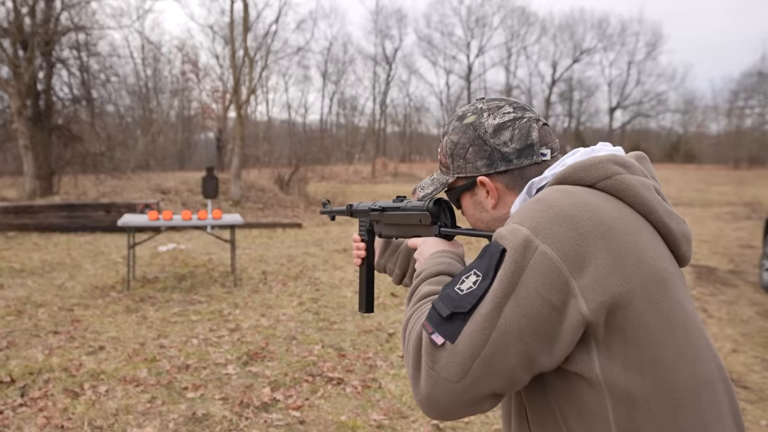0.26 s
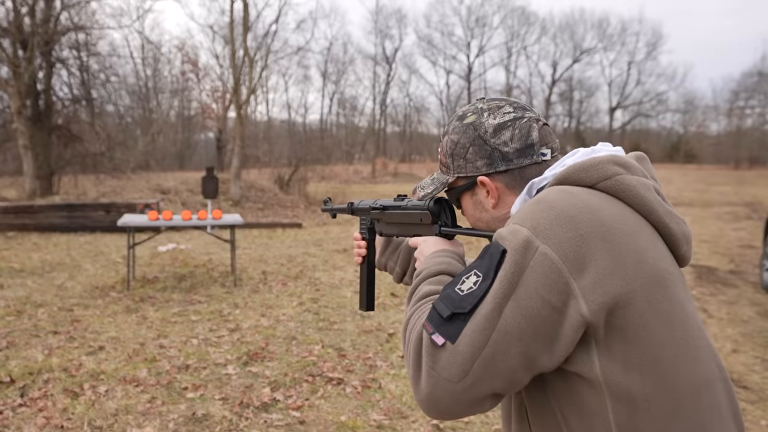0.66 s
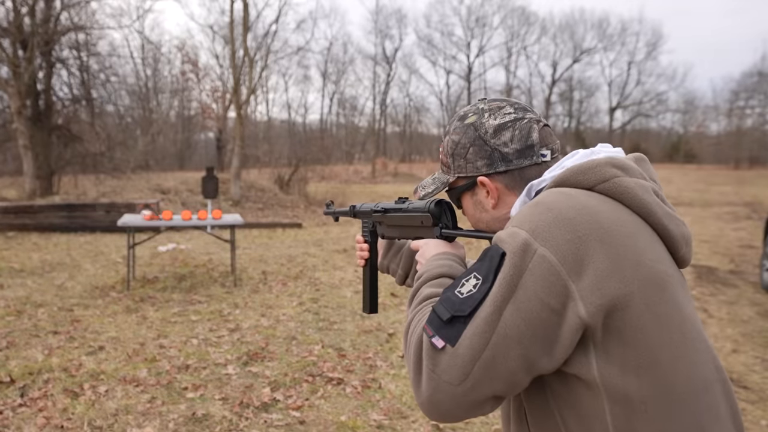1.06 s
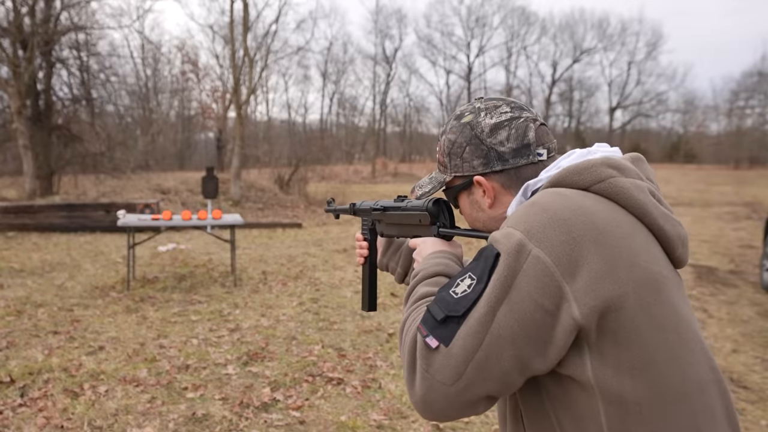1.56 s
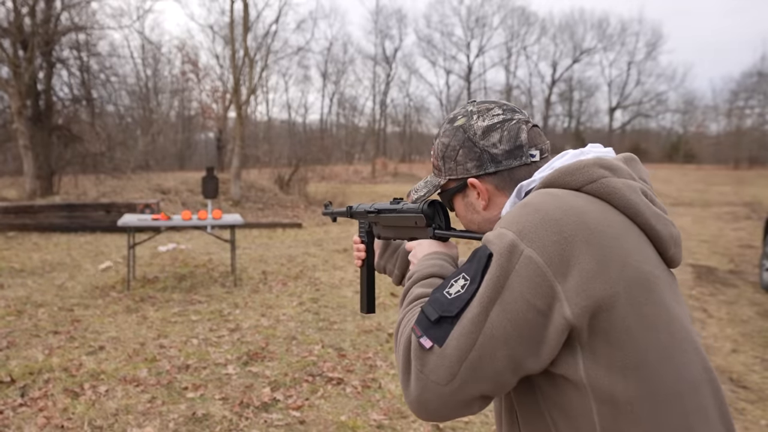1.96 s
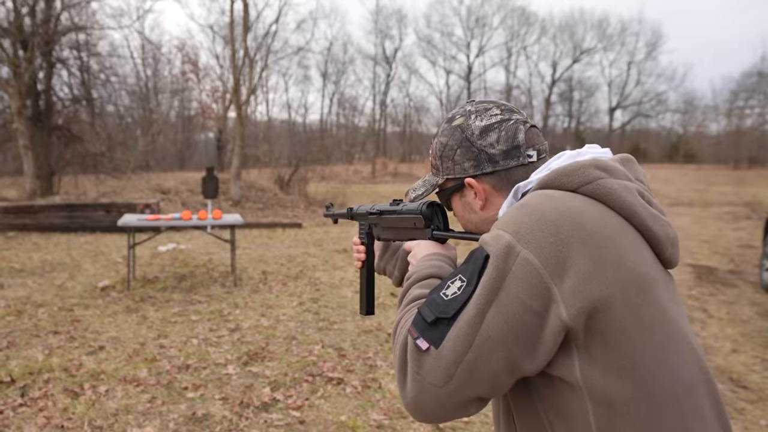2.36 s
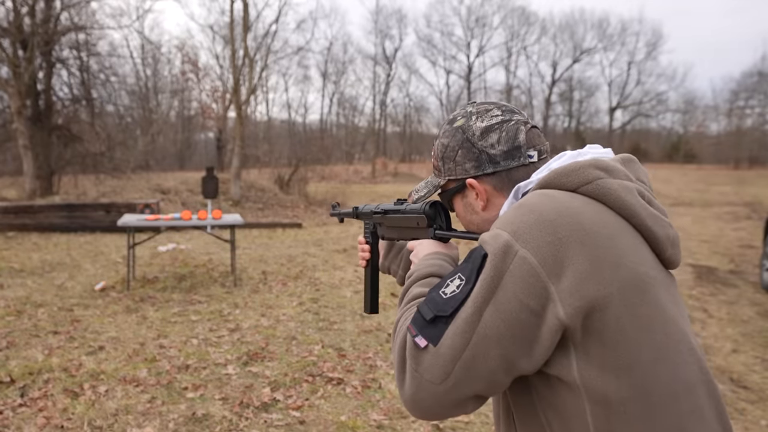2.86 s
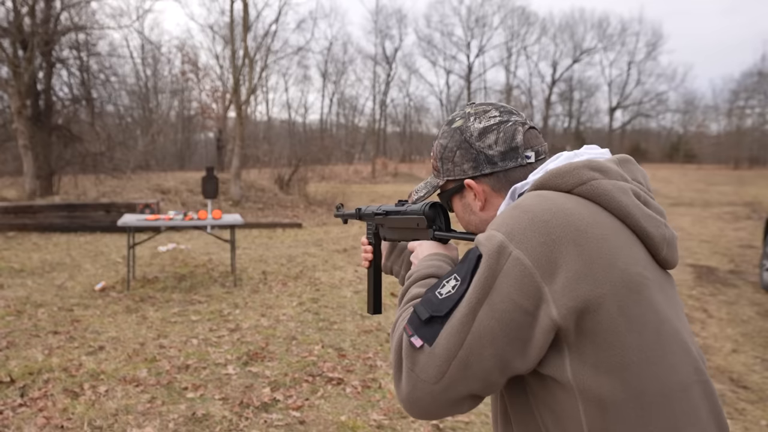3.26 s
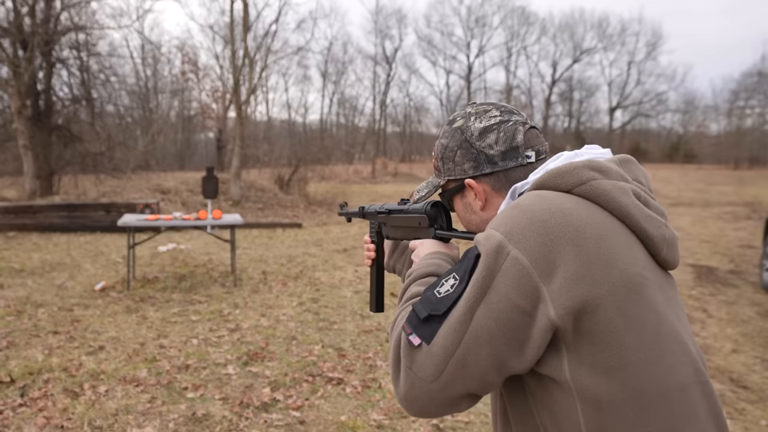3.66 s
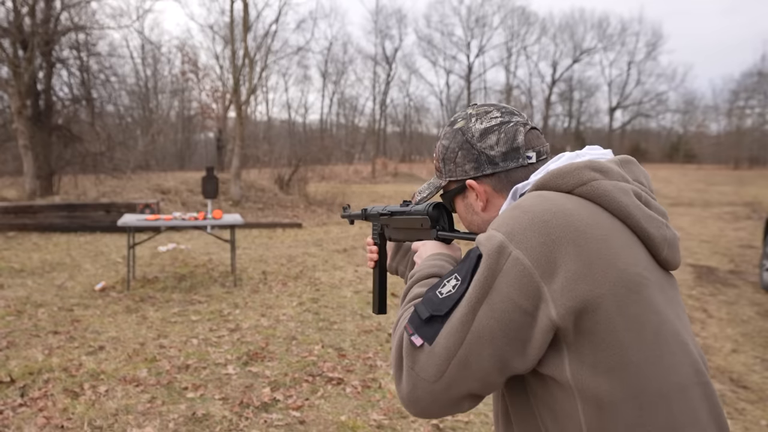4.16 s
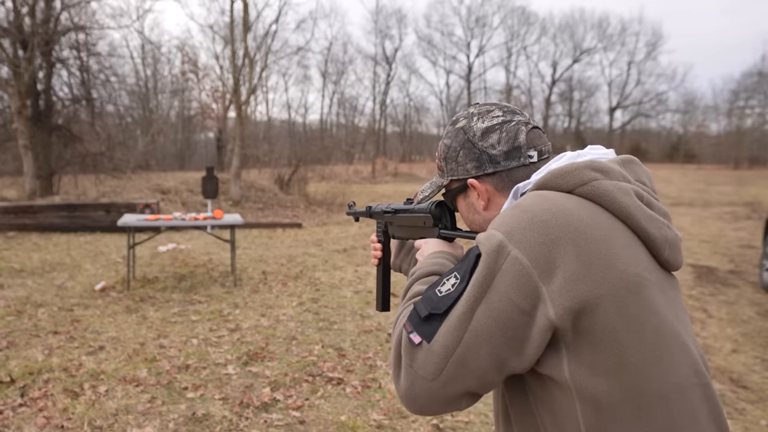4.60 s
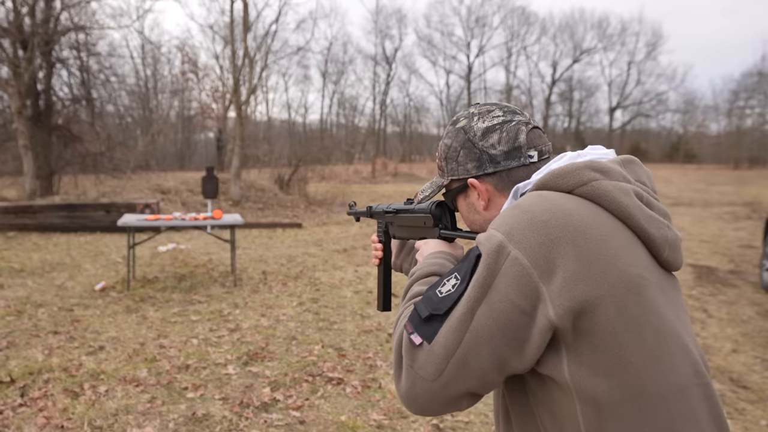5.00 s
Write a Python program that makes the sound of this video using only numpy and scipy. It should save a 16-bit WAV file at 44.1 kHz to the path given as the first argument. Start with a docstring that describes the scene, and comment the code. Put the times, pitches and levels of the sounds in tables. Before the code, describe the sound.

Close outdoor pickup, a step from the gun. Soft wind gusts and a very faint distant road drone come first, with a tiny tick. Then five rapid two- or three-shot bursts snap out, with hissing gas, a low thump and clattering steel. Between them, hollow table knocks, small ticks and leaf patter mix with lumpy woody echoes; after the third burst a small metal ping sounds.

```python
"""A light wind rumbles and gusts over a faint road drone and open-country hush; now and then a bit ticks down.
Then a gas-powered automatic BB gun fires five short bursts in a field, a step from the microphone.
In each, the trigger and bolt clack, gas thumps from the muzzle, and the bolt slams, rebounds and rattles.
Knocks of targets, table and woody returns follow, crumbs patter and the trees echo; once a metal target rings.
Blows are short noise bursts, ringing is fading sine waves, and wind and echo are shaped noise."""
import sys
import numpy as np
from scipy import signal
from scipy.fft import rfft, irfft
from scipy.io import wavfile
from scipy.ndimage import uniform_filter1d, map_coordinates

SR = 44100
rng = np.random.default_rng(int(sys.argv[2]) if len(sys.argv) > 2 else 0)


def store_wav(level_fs):
    """Save 16-bit WAV to argv[1]."""
    pcm = np.round(np.clip(np.atleast_2d(level_fs), -1, 1) * 32767)
    wavfile.write(sys.argv[1], SR, pcm.T.astype(np.int16))


N = 230988
TIME = np.arange(N) / SR

# Levels in dB are relative: most layers get a further gain when they are mixed.
# Gun shots, one list for each burst: start_s, level_db
SHOTS_BY_BURST = [
    [(.8740, -2), (.9329, .5), (.9950, 1.5)],
    [(1.9979, -1.5), (2.0548, 0)],
    [(3.0851, -1.5), (3.1409, 2.5)],
    [(4.038, -1.5), (4.0953, 1)],
    [(4.9886, -1.5), (5.0456, -1), (5.1090, -1)],
]
# How each burst starts and ends: trigger_lead_s (before the sear), trigger_db, slam_s, slam_db,
# rebound_s, rebound_db, settling_rattle_db, settling_decay_s
BURST_ENDS = [(.008, -34, 1.0458, -8.5, 1.0718, -12, -24, .016),
              (0.0044, -37, 2.1028, -7, 2.115, -15.5, -37, .018),
              (.016, -32.5, 3.1865, -5, 3.2022, -8.5, -22, 0.053),
              (.0135, -29, 4.1378, -7, 4.159, -9.5, -20.5, .027),
              (0.006, -29, 5.1526, -7, 5.1702, -12, -24.5, 0.026)]
# Stray knocks of the gun's loose parts: start_s, level_db, decay_ms, receiver_knock_db (added to level_db)
LOOSE_PARTS = [(.9905, -8.5, 1.8, 0.5), (1.0157, -17.5, 4.8, -25), (1.058, -21, 6, -4),
               (1.0665, -17.5, 4.4, 6), (1.087, -17.5, 7.3, -14), (2.983, -34, 1.4, -38),
               (2.9928, -31.5, 4.1, -18), (3.2085, -18.5, 11, -6.5), (4.205, -21.5, 4.1, -6),
               (5.0878, -8, 2.4, -6.5), (5.194, -23, 2.5, 2)]
# Tones of the gun's steel: pitch_hz, level_db, t60_s (time to fade by 60 dB)
STEEL_TONES = [(872, -12, 0.15), (1179, -15, 0.24), (1368, -4.5, 0.13), (1530, -3.5, 0.026),
               (1662, 0, 0.077), (1817, -7, 0.022), (2260, 2, 0.036), (2780, -5, .04), (3190, 1.5, 0.028),
               (3380, -6.5, 0.027), (3530, -1.5, 0.1), (3870, -10, .03), (4240, -18, .03),
               (4780, -16.5, 0.13), (6100, -10, 0.033), (8050, -6, .04)]
# Knocks after the shots: targets and table struck, and some woody returns of the shots from the trees:
# start_s, level_db, decay_ms, hollow_knock_db (added to level_db)
LATER_KNOCKS = [(1.186, -30.5, 3.7, 9), (1.201, -25.5, 11, 1), (1.239, -22.5, 4.9, -1),
                (1.327, -36, 8.3, 6), (1.390, -35.5, 15.5, 4.5), (1.441, -38, 26, -8), (2.270, -34, 12, -1),
                (2.372, -32.5, 6.2, -1.5), (3.311, -19.5, 2.6, -5), (3.351, -26.5, 2.4, 1.5),
                (3.387, -21.5, 3.4, -10), (3.421, -32.5, 20, 6.5), (3.452, -33.5, 15, 6.5),
                (3.4862, -12.5, 2.8, -6.5), (3.4945, -26.5, 30.3, -3.5), (3.688, -33, 3.5, -26),
                (4.296, -22.5, 3.2, -2), (4.3655, -24.5, 16, -19), (4.421, -25, 10, 2.5),
                (4.482, -49, 6.3, 14)]
# Bits and spent BBs landing: start_s, level_db, decay_ms, dull_part_db (added to level_db)
LANDINGS = [(.735, -61, 2.5, 9.5), (1.634, -37, 2.1, -8.5), (1.758, -52.5, 3.3, 10.5), (1.777, -59, 4.4, 8),
            (1.8245, -48.5, 4.6, 9), (2.139, -19, 1.1, -6), (2.471, -28.5, 1.4, -24),
            (2.672, -40.5, 2, -18), (2.728, -44.5, 1.9, -19), (2.736, -38, 2, -8.5), (2.763, -37.5, 2, 3.5),
            (3.799, -52, 2, 5), (3.842, -28, 1.3, -24), (3.927, -49.5, 2.8, -18), (4.596, -41.5, 2.2, -3),
            (4.82, -58.5, 4, 6.5), (4.8915, -38, 1.2, -19)]
# Tones of the table and hollow targets: pitch_hz, level_db, t60_s
TABLE_TONES = [(255, -14, 0.094), (313, -15.5, 0.087), (515.5, -1.5, 0.054), (598, -0.5, 0.039),
               (706, -4.5, 0.046), (831, 0, 0.051), (980, -2, 0.035), (1090, -5, 0.022), (1270, -11, 0.017),
               (1620, -3.5, 0.039), (2300, -18, 0.02)]
# Tones of one metal target: pitch_hz, level_db, t60_s
TARGET_TONES = [(2270, -9, .07), (3042, -9, 0.091), (6235, 1.5, 0.034), (6200, -12, 0.14),
                (6170, -1, 0.034), (7950, -19, .06)]
# Stands of trees that return a dull, woody clump: delay_s, level_db, spread_s
TREE_STANDS = [(.1, -12, .012), (0.164, -4.5, .012), (.392, -7.5, 0.014)]
# Gusts on the microphone: peak_s, level_db, half_length_s
WIND_GUSTS = [(0.136, -34, .045), (.57, -30.5, 0.032), (.66, -31, 0.038), (1.875, -32, 0.056)]
# Faint drone of a far road, a path through points: time_s, pitch_hz, level_db
ROAD_DRONE = [(0, 468.6, -63.5), (.5, 455, -74), (3.95, 400, -71.5), (4.6, 409.6, -62), (5.24, 417, -68)]

# Colours of sound, all with the columns: pitch_hz, level_db (per Hz)
# pressure thump of the muzzle gas
BLAST_COLOUR = [(40, -21.5), (80, -8), (150, -3), (270, -4.5), (340, -0.5), (430, -6.5), (560, -8),
                (720, -15), (1000, -21.5), (2000, -36), (8000, -54.5)]
# hiss of the muzzle gas
GAS_COLOUR = [(150, -27), (500, 5.5), (800, -3), (1400, 1.5), (2100, -4), (3300, 0.5), (4500, -7),
              (7500, -7), (10000, -8.5), (15000, -11.5)]
# sharp clack of the gun's moving parts
CLACK_COLOUR = [(100, -19), (650, -35), (1000, -19.5), (1500, -4), (2050, -7), (3000, -2.5), (3650, 2.5),
                (4400, -12), (5600, -12), (7500, -10), (10000, -15.5), (15000, -14.5)]
# heavier knock of the receiver
KNOCK_COLOUR = [(80, -24), (350, -18.5), (550, -2), (750, -1.5), (1000, -2.5), (1380, 3), (1900, -10.5),
                (3000, -22), (8000, -42)]
# sharp part of the later knocks, and the dull part of landing bits
STRIKE_COLOUR = [(150, -40), (700, -16), (1500, -2), (2200, -5), (3300, 4), (4500, -9.5), (7000, -11.5),
                 (10000, -14.5), (15000, -24)]
# hollow part of the later knocks
HOLLOW_COLOUR = [(100, -12), (250, 1.5), (380, -6), (550, 1), (820, -4), (1100, -6), (1600, -6),
                 (3000, -8.5), (8000, -51.5)]
# bright tick of landing bits
TICK_COLOUR = [(300, -25), (2000, -6), (4000, -2.5), (6000, -2), (9500, -0.5), (12000, -9.5), (15000, -5.5)]
# echo of the tree line
WOODS_COLOUR = [(60, -9.5), (150, -2), (260, 1), (370, -4), (550, 1), (850, -1), (1100, -4), (1550, -3.5),
                (2200, -5.5), (3300, -2), (4500, -8.5), (7500, -15.5), (15000, -28)]
# wind on the microphone
RUMBLE_COLOUR = [(15, -5.5), (35, 5.5), (60, -2), (100, -7), (150, -13.5), (250, -41), (600, -78),
                 (3000, -100)]
# hush of open country
AIR_COLOUR = [(100, 5.5), (200, -1), (300, -1.5), (480, -8), (700, -7.5), (1000, -13), (1500, -19),
              (2300, -27), (3400, -22), (4500, -31.5), (8000, -35), (15000, -34)]

# The blows of every burst: decay_ms, receiver_knock_db (added to the blow's level)
TRIGGER, SEAR, BUFFER, SLAM, REBOUND = (6.9, -12.5), (3.9, -24), (3, -19.5), (1.94, -6), (2.76, -1.2)
SEAR_LEAD_S, SEAR_DB = .0271, -15.5  # the sear lets the bolt go this long before the first shot
# the bolt reaches its rear buffer this long after a shot; the first shot throws it less hard
RECOIL_S, BUFFER_DB, FIRST_RECOIL_DB = .0275, -18.5, -11
SLIDE_DB, SLIDE_BUILD_DB_PER_S = -37, 27  # bolt and spring rattle more as the burst goes on
STROKE_DB, STROKE_RISE_S, STROKE_FALL_S = -29, 0.0093, .012  # the bolt scrapes hardest around each shot
SETTLE_KNOCK_DB = -7  # weight of the receiver's knock in the settling rattle
PING_S, PING_DB = 3.4945, -17.5
# the field's echo builds up, then dies away over a faint late tail
ECHO_BUILD_S, ECHO_T60_S, LATE_DB, LATE_T60_S = 0.047, 1.12, -32.5, 3.8
STAND_DULL_HZ = 1100
# the breeze slowly eases and wavers
WIND_DB, WIND_EASE_DB_PER_S, WIND_WAVER_DB, WIND_WAVER_S = -37.5, -1.5, 2, 0.055
TOP_HZ = 16000  # the recorder cuts the sound above this


def muzzle():
    """Gas leaves the barrel as a low thump with a spitting hiss and a sharp crack; nearby surfaces return the crack."""
    out = undb(8) * colour(reports(), BLAST_COLOUR)
    t = TIME[:SR // 20]
    for s, db in shots():
        vary = 1 + 0.041 * rng.standard_normal(2)
        # the valve leaks a moment before it opens fully
        leak = np.exp((t - .003) / 0.0011)
        emptying = np.exp((.003 - t) / 0.0026)
        flow = np.minimum(leak, emptying)
        hiss = colour(grainy(4, .0002, size=len(t)) * flow, GAS_COLOUR)
        add(out, s - .0025, undb(db - 13) * hiss)
        crack = undb(-7) * swing(3300 * vary[0], 0.0012, .0018)
        crack += undb(-10.0) * swing(7500 * vary[0], 0.00034, .0018)
        slaps = undb(-6) * swing(2900 * vary[1], .0004, .0046)
        slaps += undb(-13) * swing(2900, .0003, .01)
        add(out, s, undb(db) * (crack + slaps))
    return out


def reports():
    """The sharp pressure spike that each shot sends downrange."""
    out = np.zeros(N)
    for s, db in shots():
        add(out, s, undb([db]))
    return out


def shots():
    """Every shot of every burst: start_s, level_db."""
    return [shot for burst in SHOTS_BY_BURST for shot in burst]


def swing(hz, decay_s, delay_s):
    """One damped pressure swing that starts after a delay."""
    t = np.maximum(TIME[:SR // 20] - delay_s, 0)
    return np.sin(2 * np.pi * hz * t) * np.exp(-t / decay_s)


def action():
    """The bolt's blows and its sliding rattle excite the receiver, whose steel rings on."""
    sharp, heavy = contacts(blows(), rise_ms=.3, low_stretch=1.1, spread_db=5)
    slide, settle = rattling()
    # the points of contact keep shifting, and the colour of the rattle with them
    chatter = mottle(grainy(spread_db=4.5, grain_s=0.0016), spread_db=3.2, hold_s=.012)
    rattle = (slide + settle) * chatter
    knock = heavy + (undb(-14.5) * slide + undb(SETTLE_KNOCK_DB) * settle) * chatter
    clack = colour(undb(1.5) * sharp + undb(-1.0) * rattle, CLACK_COLOUR)
    direct = clack + colour(knock, KNOCK_COLOUR)
    ringing = through(undb(-8.0) * sharp + undb(-6.0) * rattle, unit(ring(STEEL_TONES)))
    return direct + ringing


def blows():
    """Trigger and sear open a burst, each shot throws the bolt back, and a last empty stroke slams and rebounds."""
    rows = list(LOOSE_PARTS)
    for burst, ends in zip(SHOTS_BY_BURST, BURST_ENDS):
        lead_s, trigger_db, slam_s, slam_db, rebound_s, rebound_db, _, _ = ends
        sear_s = burst[0][0] - SEAR_LEAD_S
        rows.append((sear_s - lead_s, trigger_db, *TRIGGER))
        rows.append((sear_s, SEAR_DB, *SEAR))
        rows.append((slam_s, slam_db, *SLAM))
        rows.append((rebound_s, rebound_db, *REBOUND))
        for k, (s, db) in enumerate(burst):
            recoil_db = BUFFER_DB + db + FIRST_RECOIL_DB * (k == 0)
            rows.append((s + RECOIL_S, recoil_db, *BUFFER))
    return rows


def rattling():
    """Strength of the rattle while the bolt cycles, and while the gun settles after the rebound."""
    slide, settle = np.zeros(N), np.zeros(N)
    for burst, (*_, rebound_s, _, settle_db, settle_s) in zip(SHOTS_BY_BURST, BURST_ENDS):
        since = TIME - (burst[0][0] - SEAR_LEAD_S)
        moving = (since > 0) & (TIME < rebound_s)
        strokes = sum(undb(STROKE_DB + db) * swell(s, STROKE_RISE_S, STROKE_FALL_S) for s, db in burst)
        building = undb(SLIDE_DB + SLIDE_BUILD_DB_PER_S * since * moving)
        slide += moving * (building + strokes)
        settle += undb(settle_db) * swell(rebound_s + .005, .002, settle_s)
    return slide, settle


def swell(s, rise_s, fall_s):
    """Envelope that grows to 1 at time s and dies away."""
    return np.exp(-np.maximum((s - TIME) / rise_s, (TIME - s) / fall_s))


def knocks_and_bits():
    """Targets and table are struck, trees return some woody knocks, and small bits land."""
    sharp, heavy = contacts(LATER_KNOCKS, rise_ms=0.3, low_stretch=1.3, spread_db=2)
    bright, dull = contacts(LANDINGS + patter(), rise_ms=0.3, low_stretch=1.4, spread_db=2.0)
    knocks = colour(undb(-4.5) * heavy, HOLLOW_COLOUR)
    knocks += through(undb(-2.0) * heavy, unit(ring(TABLE_TONES)))
    strikes = colour(undb(-3.0) * sharp + dull, STRIKE_COLOUR)
    return strikes + knocks + colour(undb(-4.5) * bright, TICK_COLOUR)


def patter(count=170, mean_db=-51, spread_db=4, flight_s=.22, fall_s=.8, fade_db=-7):
    """After the shots, crumbs drop into dry leaves at random; late ones tend to be softer."""
    fired = shots()
    rows = []
    for shot, late, size in rng.random((count, 3)):
        s = fired[int(shot * len(fired))][0] + flight_s + fall_s * late
        # most crumbs are soft and a few are much louder
        db = mean_db + fade_db * late - spread_db * np.log(1 - size)
        rows.append((s, db, .9, -8))
    return rows


def ping():
    """One metal target is struck and rings briefly, as a sum of fading tones."""
    out = np.zeros(N)
    add(out, PING_S, undb(PING_DB) * ring(TARGET_TONES))
    return out


def woods(x, split_hz=4500, air_loss_db_per_s=12, trunks_db=-2.0):
    """Brush scatters sound back in clumps, trunks as slaps, stands as dull knocks; treble fades on the way."""
    brush = grainy(spread_db=4, grain_s=.01)
    # one trunk at a random place in each slot, 28 slots a second
    trunks = np.zeros(N)
    spacing = SR // 28
    starts = np.arange(0, N - spacing, spacing)
    places = starts + rng.integers(0, spacing, len(starts))
    trunks[places] = rng.standard_normal(len(starts)) * np.sqrt(spacing)
    trunks = uniform_filter1d(trunks, size=8)  # rough bark dulls each slap
    build = 1 - np.exp(-(TIME / ECHO_BUILD_S) ** 2)
    fade = undb(-60 * TIME / ECHO_T60_S) + undb(LATE_DB - 60 * TIME / LATE_T60_S)
    scatter = (brush + undb(trunks_db) * trunks) * build * fade
    low = signal.sosfiltfilt(signal.butter(2, split_hz, fs=SR, output="sos"), scatter)
    high = (scatter - low) * undb(-air_loss_db_per_s * TIME)
    clumps = sum(undb(db) * np.exp(-((TIME - s) / spread_s) ** 2) for s, db, spread_s in TREE_STANDS)
    dulling = signal.butter(2, STAND_DULL_HZ, fs=SR, output="sos")
    stands = signal.sosfilt(dulling, clumps * rng.standard_normal(N))
    return through(x, unit(colour(low + high + stands, WOODS_COLOUR)))


def outdoors():
    """A wavering breeze eases off and a few gusts rumble on the microphone, over the hush of open country."""
    buffet = colour(rng.standard_normal(N), RUMBLE_COLOUR)
    # even out the rumble, so that breeze and gusts alone set its level
    buffet /= np.sqrt(uniform_filter1d(buffet ** 2, size=SR // 8))
    waver = np.interp(TIME / WIND_WAVER_S, np.arange(N), rng.standard_normal(N))
    breeze = undb(WIND_DB + WIND_EASE_DB_PER_S * TIME + WIND_WAVER_DB * waver)
    gusts = sum(undb(db) * np.exp(-((TIME - s) / half_s) ** 2) for s, db, half_s in WIND_GUSTS)
    hush = undb(-53.5) * colour(rng.standard_normal(N), AIR_COLOUR)
    return buffet * np.hypot(breeze, gusts) + hush


def road(width_hz=8):
    """Far tyres sing a narrow, wavering band of noise."""
    s, hz, db = np.transpose(ROAD_DRONE)
    noise = rng.standard_normal(N) + 1j * rng.standard_normal(N)
    waver = signal.sosfilt(signal.butter(2, width_hz, fs=SR, output="sos"), noise)
    # slow noise shifted up to the gliding pitch
    turns = np.cumsum(np.interp(TIME, s, hz)) / SR
    tone = np.real(waver * np.exp(2j * np.pi * turns))
    return tone / tone.std() * undb(np.interp(TIME, s, db))


def contacts(table, rise_ms, low_stretch, spread_db):
    """Each blow is a dying chatter of micro-contacts; returns its sharp part and its slower, heavy part."""
    sharp, heavy = np.zeros(N), np.zeros(N)
    ms = 1000 * TIME[:SR // 8]
    rise = 1 - np.exp(-ms / rise_ms)
    for s, db, decay_ms, weight_db in table:
        chatter = grainy(spread_db, .00015, size=len(ms))
        add(sharp, s, undb(db) * rise * np.exp(-ms / decay_ms) * chatter)
        slow_fade = np.exp(-ms / (decay_ms * low_stretch))
        add(heavy, s, undb(db + weight_db) * rise * slow_fade * rng.standard_normal(len(ms)))
    return sharp, heavy


def ring(modes):
    """A struck solid rings as a few sine tones, each fading at its own pace."""
    t = TIME[:SR // 3]
    out = np.zeros(len(t))
    for k, (hz, db, t60) in enumerate(modes):
        sign = (-1) ** k  # every other tone starts downward
        out += sign * undb(db - 60 * t / t60) * np.sin(2 * np.pi * hz * t)
    return out


def grainy(spread_db, grain_s, size=N):
    """Noise made of brief grains of uneven size, rms 1."""
    noise, sizes = rng.standard_normal((2, size))
    levels = np.interp(TIME[:size] / grain_s, np.arange(size), np.clip(sizes, -2, 2))
    x = noise * undb(spread_db * levels)
    return x / x.std()


def mottle(x, spread_db, hold_s, size=512):
    """Let pitch bands, mostly about a third of an octave, swell and sink on their own, a new level every hold_s."""
    overlap = size - size // 4
    hz, t, cells = signal.stft(x, SR, nperseg=size, noverlap=overlap)
    levels = rng.standard_normal((32, 1024))
    where = np.meshgrid(3 * np.log2(1 + hz / 100), t / hold_s, indexing="ij")
    gain = undb(spread_db * map_coordinates(levels, where, order=1, mode="mirror"))
    gain = gain / np.sqrt(np.mean(gain ** 2))
    return signal.istft(cells * gain, SR, nperseg=size, noverlap=overlap)[1][:N]


def colour(x, points, size=4096):
    """Causal filter with the given spectrum; white noise keeps its level."""
    hz, db = np.transpose(points)
    f = np.maximum(np.fft.rfftfreq(size, 1 / SR), 1)
    gain = undb(np.interp(np.log(f), np.log(hz), db))
    # folding the cepstrum puts the filter's energy as early as possible
    cepstrum = irfft(np.log(gain))
    cepstrum[1:size // 2] *= 2
    cepstrum[size // 2 + 1:] = 0
    return through(x, unit(irfft(np.exp(rfft(cepstrum)))))


def through(x, response):
    """Pass a sound through an impulse response."""
    return signal.fftconvolve(x, response)[:len(x)]


def unit(x):
    """Scale a response to unit energy."""
    return x / np.sqrt(np.sum(x ** 2))


def add(track, s, sound):
    """Mix a sound into a track at time s."""
    i = int(round(s * SR))
    track[i:i + len(sound)] += sound[:max(N - i, 0)]


def undb(db):
    """Decibels to gain."""
    return 10 ** (np.asarray(db) / 20)


def scene():
    """Gun, knocks and landing bits, their echo and the open air."""
    gun, downrange = action(), knocks_and_bits()
    echo = woods(undb(2) * reports() + undb(-18.5) * gun + undb(-24.5) * downrange)
    # returns from many trunks interfere, so the echo comes in lumps of changing colour
    echo = mottle(echo, spread_db=4.0, hold_s=.025)
    mix = muzzle() + gun + downrange + ping() + echo + outdoors() + road()
    return mix[None]


def record(dry, ceiling=0.56):
    """The recorder rounds off the loudest peaks and cuts the top."""
    rounded = ceiling * np.tanh(dry / ceiling)
    return signal.sosfilt(signal.ellip(10, .2, 70, TOP_HZ, fs=SR, output="sos"), rounded)


dry = scene()
out = record(dry)
store_wav(out)
```